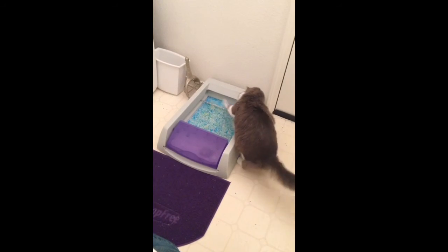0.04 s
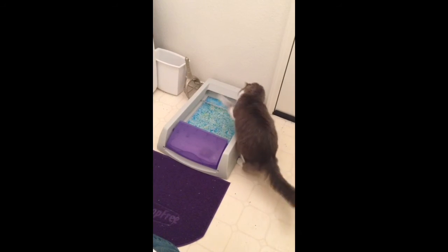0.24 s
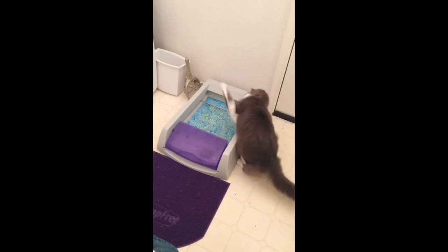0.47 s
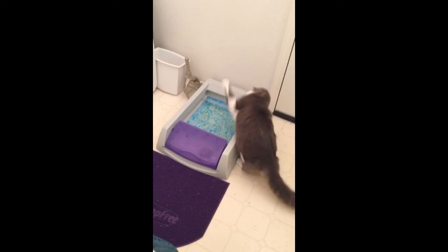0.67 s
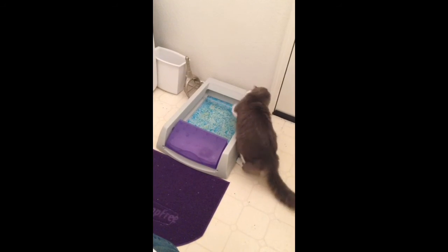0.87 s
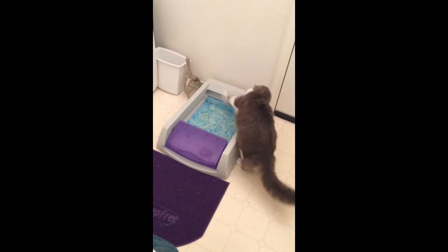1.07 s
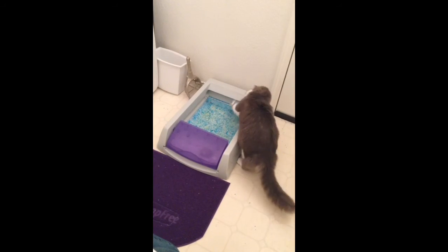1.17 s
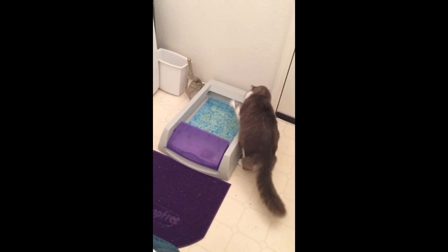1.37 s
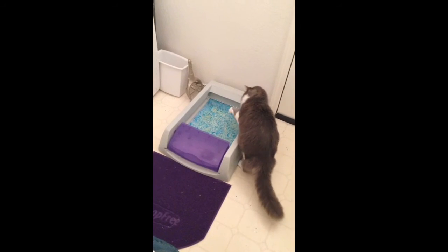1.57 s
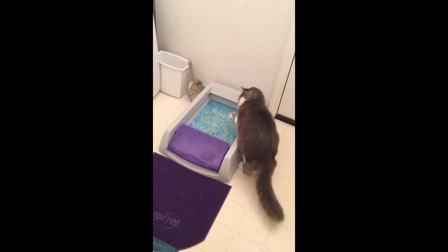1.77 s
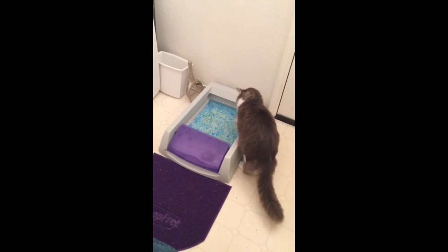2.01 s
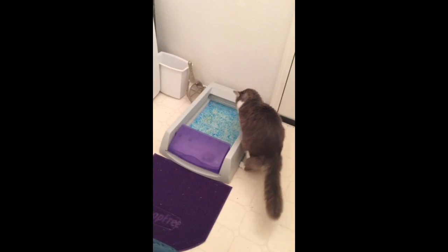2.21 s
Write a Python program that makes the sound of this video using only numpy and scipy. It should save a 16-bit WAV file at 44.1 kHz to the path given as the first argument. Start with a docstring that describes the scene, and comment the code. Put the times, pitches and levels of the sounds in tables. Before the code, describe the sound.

A cat's paw scrapes and bumps a plastic litter box in quick strokes, with small squeaks and one hard hollow knock, then quiet with a faint appliance hum; small hard room, phone microphone.

```python
"""Over a faint hum and hiss, a cat paws at the rim of a plastic litter box in a small hard-walled room.
Each stroke is a short scrape of claws (gritty noise) and a push of the pad that rings the box resonances.
One stroke knocks the box hard; some strokes squeak as the pad slides.
An appliance behind a wall, a stack of tones, hums and swells.
Near the end something small and hard tinks once: decaying noise in high resonances. A phone hears it all."""
import sys
import numpy as np
from scipy import signal
from scipy.fft import rfft, irfft, next_fast_len
from scipy.io import wavfile
from scipy.ndimage import map_coordinates

SR = 44100
rng = np.random.default_rng(int(sys.argv[2]) if len(sys.argv) > 2 else 0)


def digitize_waveform(pressure):
    """Quantize a signal to 16-bit integers and store it at the path in sys.argv[1].

    Rows of a 2-D input are taken as channels; values are limited to [-1, 1].
    """
    field = np.atleast_2d(pressure).T
    bounded = np.clip(field, -1, 1)
    quanta = np.round(bounded * 32767).astype(np.int16)
    wavfile.write(sys.argv[1], SR, quanta)


def to_linear_factor(level_db):
    """Convert decibel levels (scalar or array-like) to linear amplitude factors."""
    exponent = np.asarray(level_db, float) / 20
    return 10 ** exponent


N = 99225


def unit(x):
    """Scale to rms 1."""
    return x / np.sqrt(np.mean(x ** 2) + 1e-20)


def along(points, hz):
    """Interpolate (frequency [Hz], value) points on a log frequency axis."""
    f, value = np.transpose(points)
    return np.interp(np.log(hz + 1), np.log(f + 1), value)


def wobble(knots_per_s):
    """Smooth random curve: a spline through normal random knots."""
    knots = rng.standard_normal(N // 100)
    return map_coordinates(knots, [np.arange(N) * knots_per_s / SR])


def filtered(x, response):
    """Filter x by a complex response of frequency, scaled to mean power 1."""
    size = next_fast_len(N + SR // 2)
    h = response(np.fft.rfftfreq(size, 1 / SR))
    h = h / np.sqrt(np.mean(abs(h) ** 2))
    return irfft(rfft(x, size) * h, size)[:N]


def causal(points):
    """Minimum-phase response through (frequency [Hz], level [dB]) points, by folding the cepstrum."""
    def response(hz):
        level_db = np.maximum(along(points, hz), -80)
        cepstrum = irfft(np.log(to_linear_factor(level_db)))
        half = len(cepstrum) // 2
        cepstrum[1:half] *= 2
        cepstrum[half + 1:] = 0
        return np.exp(rfft(cepstrum))
    return response


def resonances(table):
    """Causal sum of (centre [Hz], width [Hz], level [dB]) resonances, alternating in sign."""
    def response(f):
        total = 0
        for k, (centre, width, db) in enumerate(table):
            band = 1j * f * width / (centre * centre - f * f + 1j * f * width)
            total = total + (-1) ** k * to_linear_factor(db) * band
        return total
    return response


CLAW_GRAINS_PER_S, PAD_GRAINS_PER_S, GRAIN_SPREAD_DB = 9000, 1800, 2.5


def grit(grains_per_s):
    """Stick-slip grains at random times and of uneven size, rms 1."""
    on = rng.random(N) < grains_per_s / SR
    size = rng.standard_normal(N) * to_linear_factor(GRAIN_SPREAD_DB * rng.standard_normal(N))
    return unit(on * size)


# room tone and hiss spectrum: (frequency [Hz], relative level [dB])
AIR_SPECTRUM = [(15, -63), (25, -22), (96, -16.5), (198, -7), (399, -10.5), (457, -4), (666, -9),
                (741, -8.5), (1900, -17.5), (14300, -33), (15500, -21)]
AIR_DB = -55


def air():
    """Room tone and microphone hiss: shaped noise, gently unsteady in level."""
    hiss = filtered(rng.standard_normal(N), lambda f: to_linear_factor(along(AIR_SPECTRUM, f)))
    return to_linear_factor(AIR_DB + 0.56 * wobble(2.46)) * unit(hiss)


# swells of the two lowest tones: (time [s], lowest tone level [dB], octave level [dB])
HUM_SWELLS = [(0, -51, -56.5), (0.098, -52.5, -67), (.5, -61, -58), (1.1, -59, -65), (1.27, -65, -53.5),
              (1.33, -44, -62), (1.42, -61.5, -52.5), (1.6, -60, -61.5), (1.72, -48.5, -61),
              (1.78, -54, -57), (1.85, -65, -66), (2.0, -59.5, -66), (2.08, -48.5, -62), (2.16, -47.5, -57),
              (2.2, -64, -63), (2.25, -81, -70)]
# steady upper tones: (multiple of the lowest, level [dB])
HUM_OVERTONES = [(3, -65), (4, -66), (5, -69.5), (6, -74)]
HUM_HZ, HUM_DRIFT_FRACTION, HUM_FLUTTER_DB = 153, 0.00593, 1.5
FUZZY_HZ, FUZZY_WIDTH_HZ, FUZZY_DB = 201, 14, -57.5


def hum():
    """Appliance: harmonics sharing one drifting pitch, each fluttering, plus a narrow noise band."""
    t = np.arange(N) / SR
    time_s, low_db, octave_db = np.transpose(HUM_SWELLS)
    pitch_hz = HUM_HZ * (1 + HUM_DRIFT_FRACTION * wobble(14))
    phase = 2 * np.pi * np.cumsum(pitch_hz) / SR

    def tone(multiple, level_db):
        level = np.sqrt(2) * to_linear_factor(level_db + HUM_FLUTTER_DB * wobble(12))
        return level * np.sin(multiple * phase + 2 * np.pi * rng.random())

    stack = tone(1, np.interp(t, time_s, low_db)) + tone(2, np.interp(t, time_s, octave_db))
    for multiple, db in HUM_OVERTONES:
        stack = stack + tone(round(multiple), db)
    fuzzy = filtered(rng.standard_normal(N), lambda f: 1 / (1 + ((f - FUZZY_HZ) / FUZZY_WIDTH_HZ) ** 2))
    return stack + to_linear_factor(FUZZY_DB) * unit(fuzzy)


# reverberation: (frequency [Hz], time to fall 60 dB [s])
ROOM_T60 = [(150, 0.36), (500, 0.36), (1500, 0.33), (4000, 0.34), (8000, 0.29), (15000, 0.27)]
ROOM_GAP_S = 0.006


def room(x):
    """Noise tails, each frequency dying at its own speed; a fresh random tail every sixteenth of a second."""
    out = np.zeros(N)
    step = SR // 16
    for start in range(0, N, step):
        hz, t, z = signal.stft(rng.standard_normal(SR // 2), SR, nperseg=256)
        decay = to_linear_factor(-60 * t / along(ROOM_T60, hz)[:, None])
        tail = signal.istft(z * decay, SR, nperseg=256)[1]
        tail = np.pad(tail / np.linalg.norm(tail), (round(ROOM_GAP_S * SR), 0))
        wet = signal.fftconvolve(x[start:start + step], tail)
        out[start:start + len(wet)] += wet[:N - start]
    return out


# small hard object: (centre [Hz], width [Hz], relative level [dB])
TINK_RESONANCES = [(3356, 93, 3.5), (4030, 1050, -11), (8500, 900, -15.5), (12100, 1400, -18)]
TINK_S, TINK_DB, TINK_T60_S = 2.159, -46.5, 0.1
CRACK_DB, CRACK_T60_S = -51, 0.052


def tink():
    """Small hard object: a decaying white crack and a gritty rattle in a few high resonances."""
    since_s = np.maximum(np.arange(N) / SR - TINK_S, 0)
    on = since_s > 0
    burst = on * to_linear_factor(TINK_DB - 60 * since_s / TINK_T60_S) * rng.standard_normal(N)
    rattle = filtered(burst, resonances(TINK_RESONANCES))
    crack = on * to_linear_factor(CRACK_DB - 60 * since_s / CRACK_T60_S) * rng.standard_normal(N)
    return rattle + crack


# pad slides on the plastic: (time [s], length [s], level [dB])
SLIDES = [(0.052, .06, -59), (0.212, 0.075, -41.5), (0.295, 0.042, -44.5), (0.483, 0.068, -45)]
RUB_HZ, RUB_WIDTH_HZ = 2400, 250


def squeak():
    """Sliding pad: stick-slip grit in one narrow band."""
    t = np.arange(N) / SR
    slide = np.zeros(N)
    for start, length, db in SLIDES:
        arch = np.sin(np.pi * np.clip((t - start) / length, 0, 1)) ** 0.5
        slide = slide + to_linear_factor(db) * arch
    return filtered(slide * grit(CLAW_GRAINS_PER_S), resonances([(RUB_HZ, RUB_WIDTH_HZ, 0)]))


# paw strokes: (time [s], claw scrape level [dB], pad push level [dB], rise [s], fall [s])
PAW_STROKES = [(0.056, -50, -53, 0.0015, 0.08), (0.153, -45.5, -49, 0.035, 0.054),
               (.210, -36.5, -39.5, 0.0049, 0.05), (0.263, -37, -33.5, 0.012, .025),
               (0.309, -50, -40.5, 0.0081, 0.041), (0.426, -39, -37, 0.0079, 0.035),
               (0.487, -47.5, -35.5, 0.0075, 0.026), (0.523, -54.5, -43.5, 0.011, 0.04),
               (0.625, -30.5, -35, 0.016, 0.0086), (0.645, -27.5, -25.5, 0.0041, 0.031),
               (0.743, -54, -39, 0.0025, 0.004), (0.854, -39, -43.5, 0.0062, 0.043),
               (0.917, -39.5, -35, 0.014, 0.007), (0.935, -34, -35, 0.017, 0.02),
               (1.153, -39, -47.5, 0.0057, 0.028), (1.209, -47, -50.5, 0.0043, 0.023),
               (1.243, -51.5, -57.5, 0.006, 0.027), (1.298, -59.5, -57, 0.01, 0.062)]


def stroke_envelopes():
    """Claw and pad force: each stroke rises linearly and dies as a Gaussian."""
    t = np.arange(N) / SR
    claw, push = np.zeros(N), np.zeros(N)
    for start, claw_db, push_db, rise, fall in PAW_STROKES:
        since_s = np.maximum(t - start, 0)
        shape = np.minimum(since_s / rise, 1) * np.exp(-(np.maximum(since_s - rise, 0) / fall) ** 2)
        claw = claw + to_linear_factor(claw_db) * shape
        push = push + to_linear_factor(push_db) * shape
    return claw, push


# rim knocks and rattles: (time [s], level [dB], best-driven frequency [Hz]); softer contacts drive lower
RIM_KNOCKS = [(.214, -23, 900), (0.434, -20, 845), (0.6438, 5.5, 1020), (0.6458, -1, 950),
              (0.6481, 3.5, 900), (0.651, -4.5, 170), (0.669, -10.5, 1010), (.760, -21, 1250),
              (1.156, -48, 1000), (1.218, -26.5, 400), (1.254, -24, 252)]
KNOCK_WIDTH_RATIO = 0.7  # driven band over its centre


def knocks():
    """Rim blows: single impulses of random sign, each through its own broad driven band."""
    total = np.zeros(N)
    for start, db, hz in RIM_KNOCKS:
        level = to_linear_factor(db + rng.normal(0, 1)) * rng.choice([-1, 1])
        blow = (np.arange(N) == round(start * SR)) * level
        total = total + filtered(blow, resonances([(hz, KNOCK_WIDTH_RATIO * hz, 0)]))
    return total


# plastic box: (centre [Hz], width [Hz], relative level [dB])
BOX_RESONANCES = [(158.4, 19.4, 0), (235.5, 13.3, 0), (316, 13, -32), (436.5, 135, 3), (600, 42, -9.5),
                  (785, 170, 0.5), (966, 59, -9), (1067, 158, 1.5), (1365, 64, -5), (1631, 98, -5),
                  (1953, 300, -9), (2450, 180, -7), (3280, 160, -21), (3880, 640, -10.5)]
# push heard between the resonances: (frequency [Hz], relative level [dB])
BOX_BETWEEN = [(82, -28), (140, -10), (302, -17), (414, -2), (690, -6.5), (1130, -3), (3020, -20),
               (6390, -20), (15500, -41)]
BETWEEN_DB = -2


def box(drive):
    """Box walls ring in their resonances; a smooth response fills between them."""
    ringing = filtered(drive, resonances(BOX_RESONANCES))
    return ringing + to_linear_factor(BETWEEN_DB) * filtered(drive, causal(BOX_BETWEEN))


# claw scrape spectrum: (frequency [Hz], relative level [dB])
CLAW_SPECTRUM = [(470, -40), (800, -4), (940, 5), (1350, -6.5), (1570, -4), (4290, -5), (11000, -20.5),
                 (15600, -22.5)]
PAD_HZ = 900  # the soft pad drives little above this
THUD_HZ, THUD_WIDTH_HZ, THUD_DB = 70, 6.6, -32.5


def paw():
    """Claws hiss, pad and knocks drive the box, and the push thuds the floor under it."""
    claw, push = stroke_envelopes()
    knock = knocks()
    push = filtered(push * grit(PAD_GRAINS_PER_S), lambda f: 1 / (1 + 1j * f / PAD_HZ))
    ringing = box(push + knock)
    thud = to_linear_factor(THUD_DB) * filtered(push, resonances([(THUD_HZ, THUD_WIDTH_HZ, 0)]))
    scrape = filtered(claw * grit(CLAW_GRAINS_PER_S), causal(CLAW_SPECTRUM))
    return scrape + ringing, thud


ROOM_DB, MIC_LOW_CUT_HZ = -4.5, 135


def scene():
    """Paw and tink in the room with the hum, thinned by the microphone's low cut, over thud and air."""
    strokes, thud = paw()
    near = strokes + squeak() + tink()
    near = near + to_linear_factor(ROOM_DB) * room(near) + hum()
    low_cut = signal.butter(6, MIC_LOW_CUT_HZ, "high", fs=SR, output="sos")
    return (signal.sosfilt(low_cut, near) + thud + air())[None]


def top_cut(x):
    """Nothing passes above the cut-off."""
    return signal.sosfilt(signal.butter(12, 15790, fs=SR, output="sos"), x)


def record(dry):
    """The phone's band limit: a steep zero-phase low-pass, stopband from 16.1 kHz."""
    low_pass = signal.cheby2(12, 60, 16100, fs=SR, output="sos")
    mix = signal.sosfiltfilt(low_pass, dry)
    return top_cut(mix)


dry = scene()
out = record(dry)
digitize_waveform(out)
```